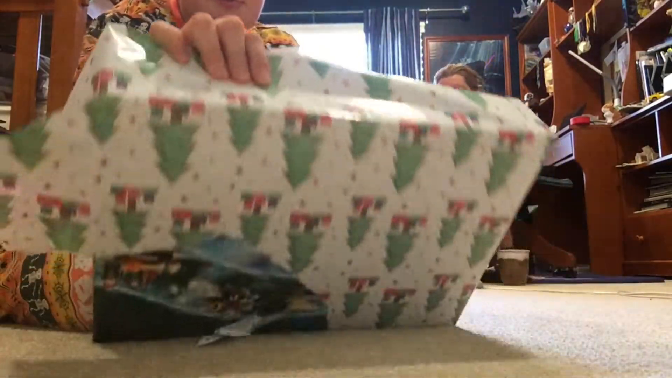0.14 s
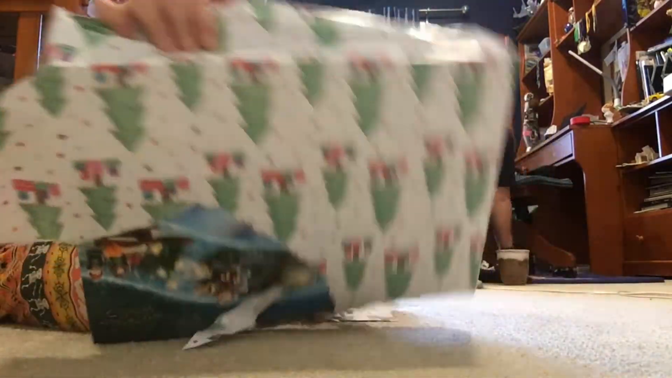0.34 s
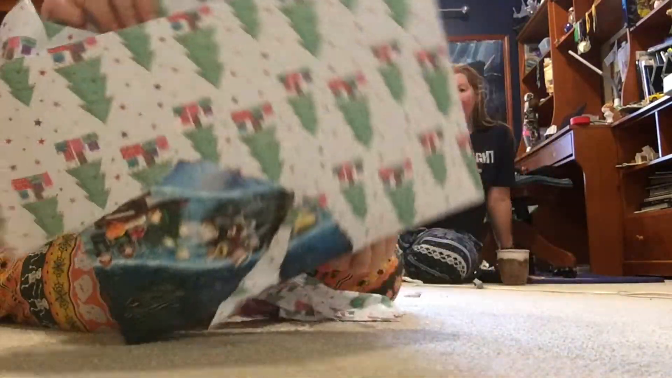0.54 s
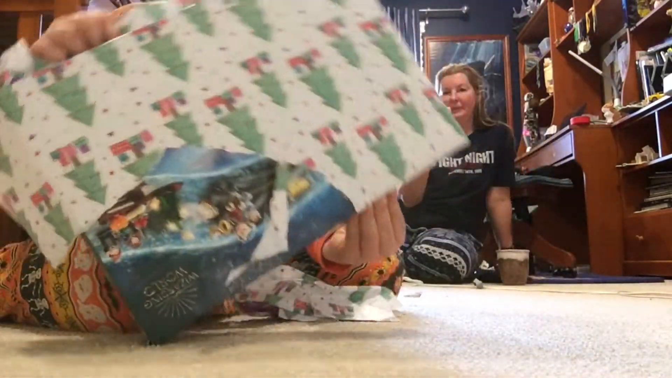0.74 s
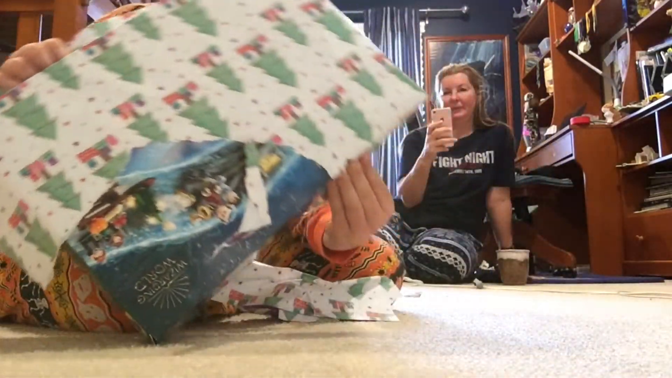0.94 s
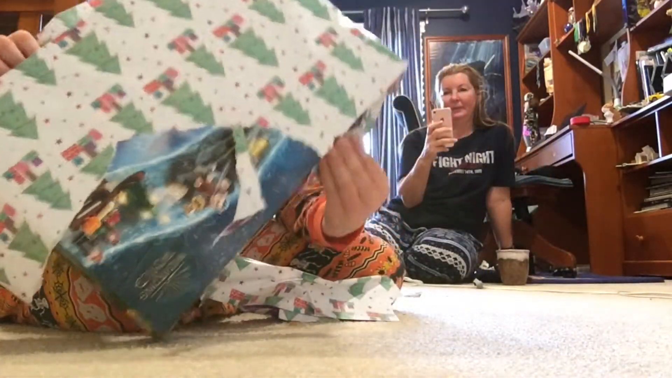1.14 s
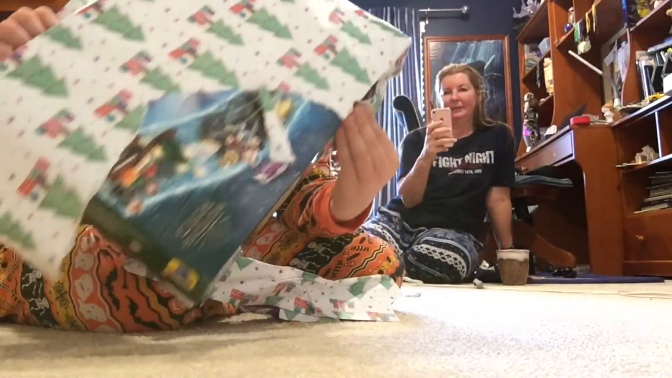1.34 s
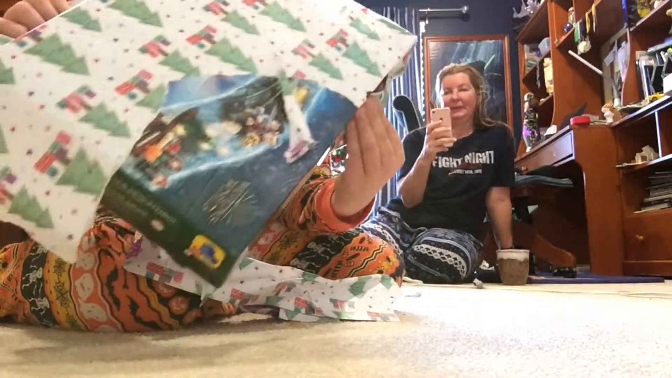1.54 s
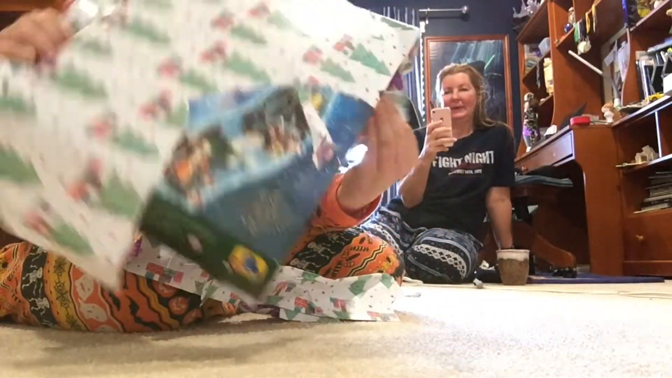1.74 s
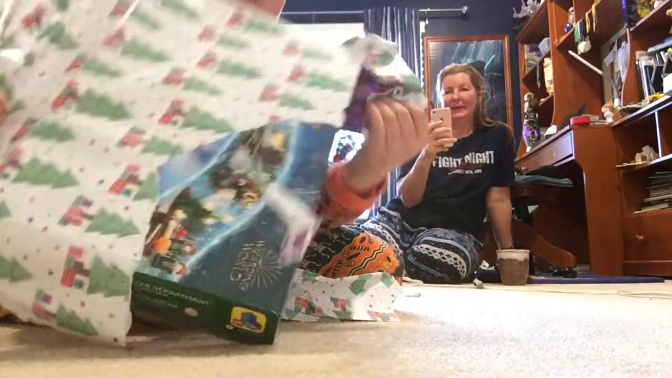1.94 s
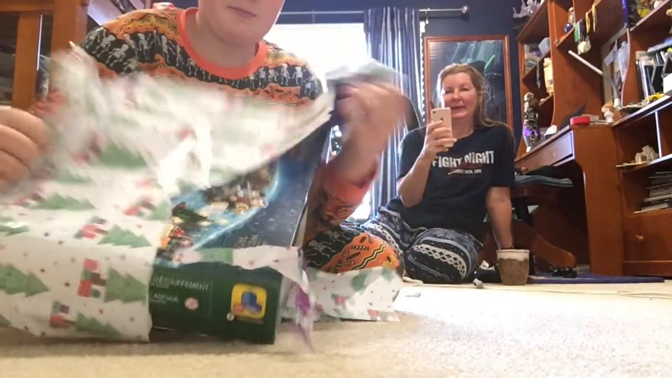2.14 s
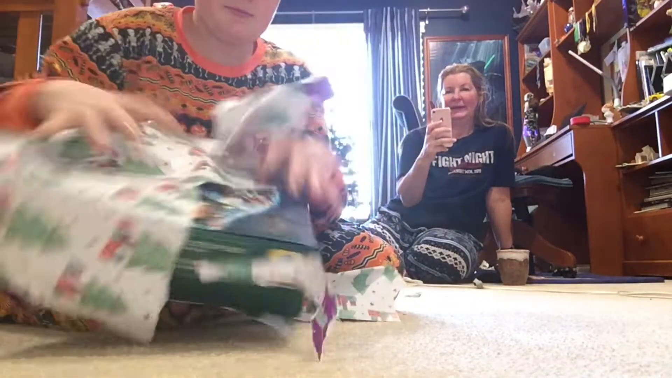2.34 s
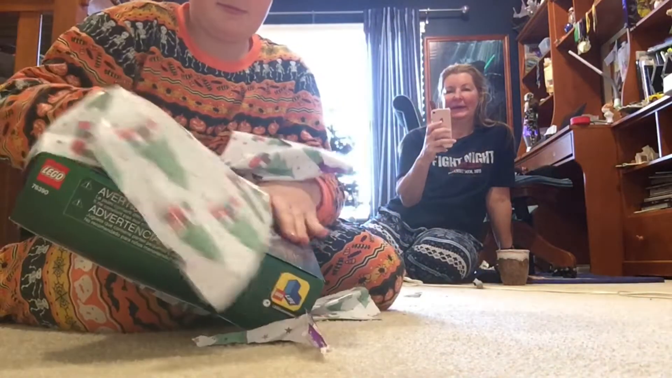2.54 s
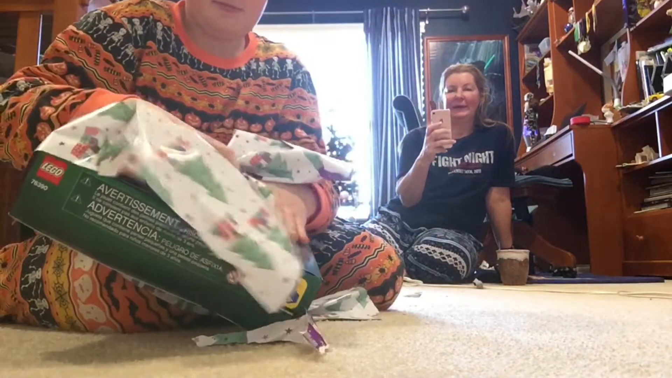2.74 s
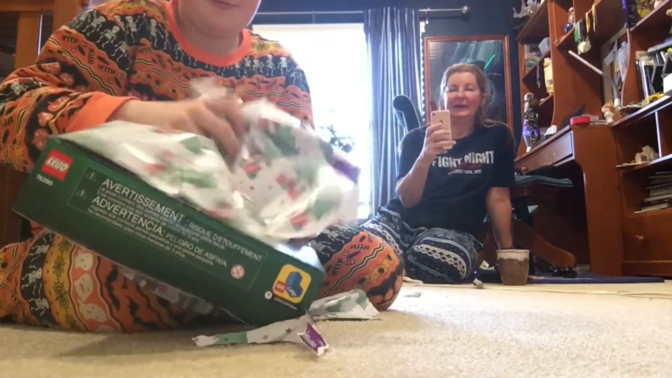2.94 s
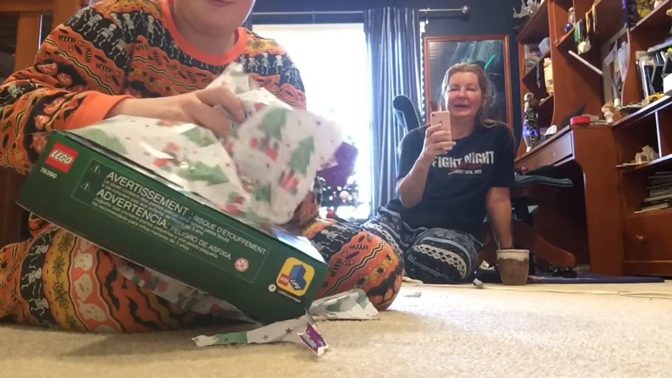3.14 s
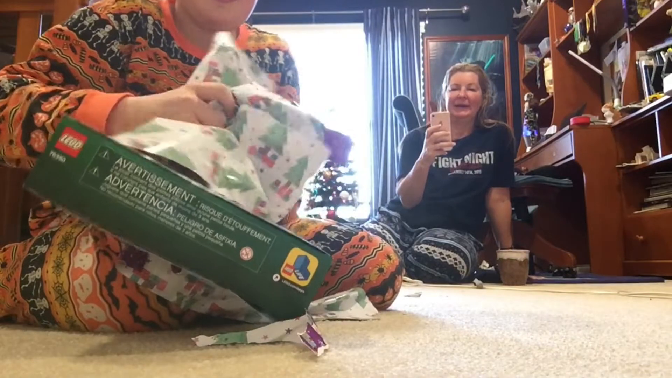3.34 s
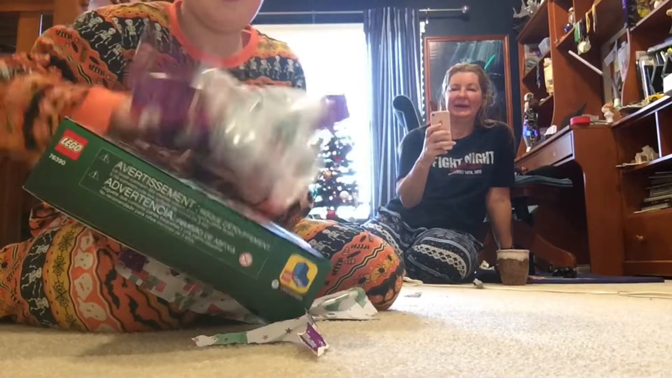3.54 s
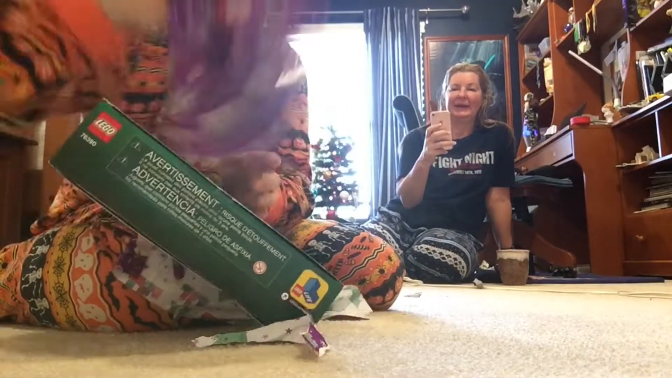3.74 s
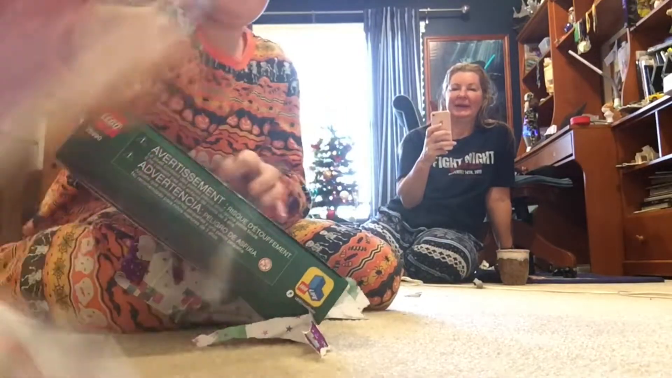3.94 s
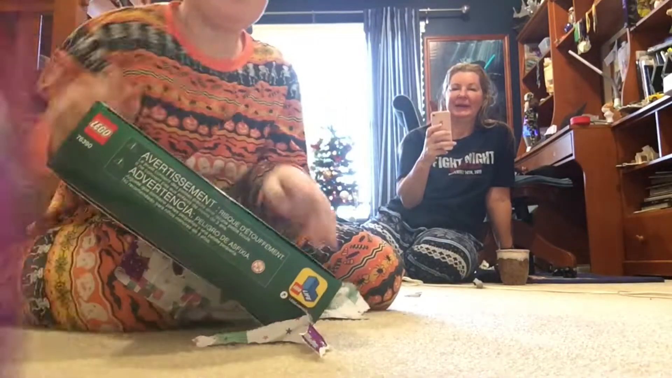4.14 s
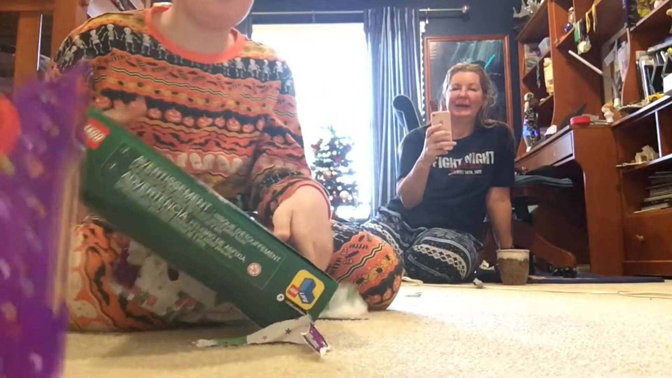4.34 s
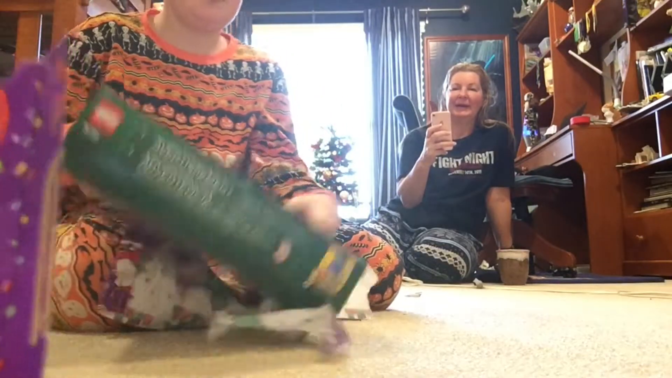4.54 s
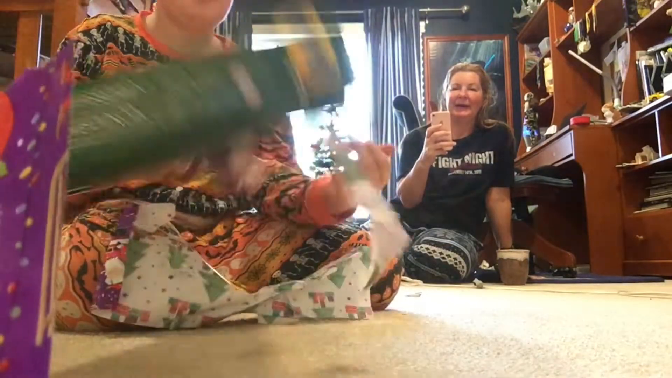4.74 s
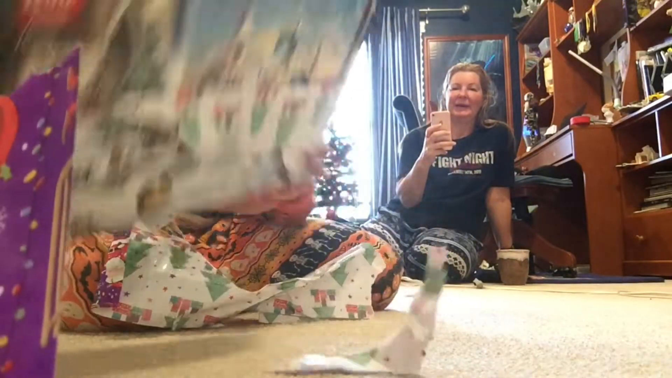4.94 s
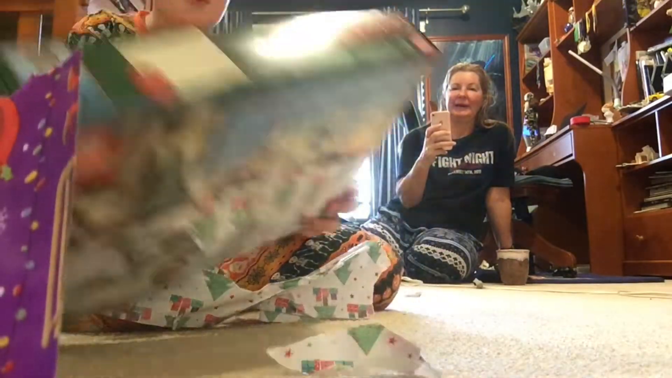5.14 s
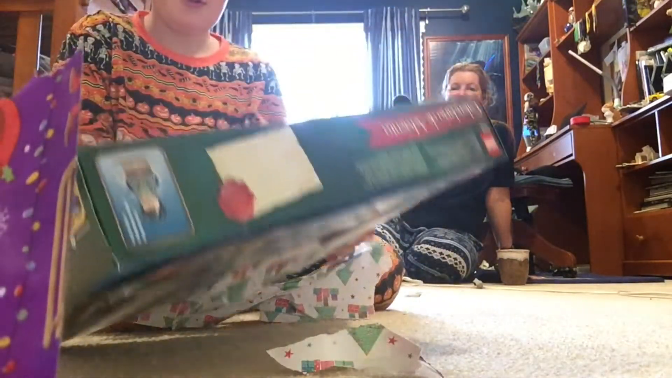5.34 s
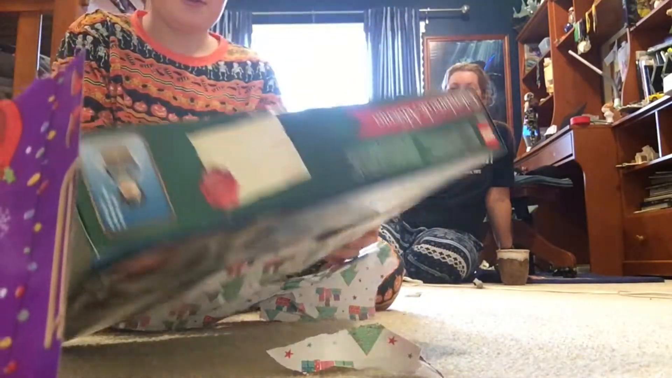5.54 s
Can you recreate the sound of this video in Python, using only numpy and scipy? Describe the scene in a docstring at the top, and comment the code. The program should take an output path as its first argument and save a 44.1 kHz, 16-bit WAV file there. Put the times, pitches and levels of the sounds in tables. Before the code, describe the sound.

A close, dry phone recording of gift wrap being pulled off a cardboard box in a carpeted, furnished room, with a faint steady low hum beneath. From 0 to 1.2 s, short irregular grips make bright crackles and crisp creasing snaps, one especially sharp near 0.27 s, with light hollow box rumble. A lull follows until about 1.6 s. A strong rip and box knock burst out near 1.8 s, then dense, louder tearing and crumpling runs in uneven pulls to 3.8 s, peaking around 2.3 s, with many ringing snaps and soft carton bumps. At about 3.85 to 4.1 s the sheet is tossed aside: a loud snap, deep flapping puffs, several dull thuds and a thin airy hiss that fades. Afterwards it is mostly quiet, with faint rustles, then abrupt snaps and hollow knocks at 4.9 and 5.03 s, and one last softer bump near 5.65 s.

```python
"""Gift paper is torn and crumpled off a cardboard box in a furnished room with a low hum, for under 6 s.
From the start, each grip of the hands swells a crackle of tiny noise bursts; creases snap as sharper, ringing bursts.
The sheet flaps and the box rumbles (filtered noise), air puffs and box knocks are short swings, and the room rings.
After a lull from about 1.2 s the pulls grow louder; near 3.84 s the sheet is tossed aside with an airy, fading hiss.
Sparser, mostly quieter grips follow, with a few strong snaps and knocks near 5 s."""
import sys
import numpy as np
from scipy import signal
from scipy.fft import rfft, irfft, next_fast_len
from scipy.io import wavfile
from scipy.ndimage import uniform_filter1d

SR = 44100
rng = np.random.default_rng(int(sys.argv[2]) if len(sys.argv) > 2 else 0)


def generate_wav(sig):
    """Save sig (samples, or channels by samples) to the path in sys.argv[1] as 16-bit PCM at SR."""
    pcm = np.round(np.clip(np.atleast_2d(sig).T, -1, 1) * 32767).astype(np.int16)
    wavfile.write(sys.argv[1], SR, pcm)


N = 250047  # length in samples

# Pulls and grips of the hands: full effort at t/s, build-up/s, hold/s,
# crackle level/dB, brightness/dB, sheet flap level/dB, hollow box level/dB
GRIPS = [(0.0, .01, 0.036, -41.5, 0.5, -52.5, -50.5), (0.124, 0.0076, .03, -54, 2, -51.5, -52.5),
         (0.197, 0.027, .14, -44.5, 1.5, -56, -48), (0.454, 0.095, .08, -51.5, -1, -52, -46),
         (0.583, 0.017, 0.048, -48.5, 0.5, -58, -55.5), (0.689, 0.052, 0.095, -52.5, -2, -55, -52.5),
         (0.864, 0.091, 0.087, -51, -1, -56, -45.5), (0.995, 0.011, 0.11, -41, 0.5, -50, -45.5),
         (1.163, 0.022, 0.029, -66.5, -9.5, -64, -57.5), (1.55, 0.036, 0.034, -67, -3.5, -61, -59),
         (1.649, 0.018, 0.21, -44.5, 0.5, -61, -49), (1.792, 0.057, 0.032, -30, 0.5, -42.5, -36.5),
         (1.871, .03, 0.14, -40, 0.5, -55.5, -44), (2.041, .03, 0.1, -39, 1, -50, -44),
         (2.154, 0.024, 0.026, -36, 1, -49, -43), (2.239, .02, 0.043, -41.5, -0.5, -50, -47.5),
         (2.338, 0.035, 0.047, -33.5, -0.5, -43.5, -41), (2.467, 0.036, 0.024, -39.5, 0, -47, -45.5),
         (2.579, 0.033, 0.19, -45.5, -1, -55, -50.5), (2.783, 0.01, 0.049, -39, -0.5, -58, -48.5),
         (2.851, .03, 0.074, -37.5, -0.5, -49, -45), (2.98, .02, 0.098, -41.5, -0.5, -61, -49),
         (3.094, .03, 0.046, -40, 0, -63, -47.5), (3.173, 0.022, 0.084, -42, -2.5, -53, -47),
         (3.292, .03, 0.062, -40.5, -0.5, -60, -47.5), (3.442, 0.077, 0.12, -47.5, -1.5, -59, -55),
         (3.539, 0.064, 0.037, -38, -1.5, -63, -47), (3.63, .03, 0.0075, -37, -1, -43.5, -45.5),
         (3.699, 0.016, 0.13, -42.5, -1, -58, -49.5), (3.832, 0.033, 0.021, -40, -2, -43, -43),
         (3.896, 0.016, 0.052, -36.5, -3, -31, -33), (4.005, 0.017, 0.11, -58, -2.5, -38.5, -49),
         (4.194, 0.044, 0.14, -63, -0.5, -59, -56), (4.358, 0.035, .06, -71.5, 2, -66, -62.5),
         (4.464, 0.049, 0.026, -59.5, -1, -53, -53.5), (4.513, .05, 0.035, -55, -0.5, -49.5, -48.5),
         (4.627, .02, 0.015, -66, -2, -59, -62.5), (4.793, 0.054, 0.085, -62.5, -6, -58, -53.5),
         (4.895, 0.0083, 0.0069, -36.5, -1.5, -39.5, -32), (5.019, .02, 0.02, -42.5, -8, -38.5, -39),
         (5.13, .03, 0.052, -57.5, -3, -52, -51), (5.359, 0.095, 0.0078, -68.5, 3, -75.5, -72.5),
         (5.634, 0.067, .05, -55, 1, -69, -67), (5.66, 0.01, .02, -50.5, -6, -39.5, -37.5)]
# Levels while the hands rest: crackle, flap, box level/dB
REST_LEVELS = (-79.5, -67.5, -74.5)
# Colour of the low hum: f/Hz, level per Hz/dB
HUM_COLOUR = [(20, -44.5), (40, -26), (95, -26), (135, 6.5), (190, -12), (245, -6), (450, -37), (1200, -49),
              (4300, -50), (9000, -47), (16000, -52)]
# Colour of folding paper: f/Hz, level per Hz/dB
PAPER_COLOUR = [(290, -51.5), (500, -2.5), (893, -15.5), (1160, -0.5), (1510, -7.5), (1670, -2), (2100, -3),
                (3110, -2.5), (3440, -4.5), (4730, -1), (5630, -7.5), (6800, -7), (10700, -12.5),
                (12100, -10), (16000, -28)]
# Colour of the flapping sheet: f/Hz, level per Hz/dB
FLAP_COLOUR = [(20, -32.5), (45, -6), (80, 8), (110, 8.5), (140, 11.5), (180, -1.5), (300, -35.5)]
# Colour of the hollow box: f/Hz, level per Hz/dB
BOX_COLOUR = [(120, -23), (190, 2.5), (280, 0), (400, 0), (520, -9), (800, -12), (1200, -35)]
# Creases whose snaps stand out from the rustle around them, plus loose pieces rattling in the box just after
# the knock near 4.87 s: t/s, peak level/dB, ring f/Hz, ring boost/dB, treble edge/dB (before the shared lift in
# snaps), decay/ms
SNAPS = [(.0193,-28,3780,24,-23,2.5),(.0444,-23.5,3750,24,3,0.49),(.145,-32,1750,8.5,-27,0.96),(.1897,-33.5,5930,7,0,6.8),
         (.205,-34.5,8300,22.5,-4,4),(.2191,-24,8400,12,6,1.8),(.225,-26,4230,17,8,2.7),(.235,-31,2350,12.5,-6,3.4),
         (.258,-33.5,3250,5,-5,1.7),(.271,-8,2735,20.5,-17,0.71),(.2834,-30,2300,26.5,-11.5,4),(.3194,-30,1670,15,-15,2.1),
         (.338,-30,1290,18,-8,3.1),(.4529,-35,3270,9,-15,6.1),(.4667,-29,5200,9,-3,.7),(.483,-30,1090,12,-22,1.7),
         (.503,-33.5,2480,20,-30,1.6),(.5226,-29.5,2640,4,-44,3.1),(.5837,-35.5,1530,22,-16,3.4),(.6045,-37,4400,3,-10,2.6),
         (.6182,-26,1800,9,-14,1.34),(.6943,-22,3360,6,1,1.5),(.8533,-30.5,3580,16,11,1.5),(.9115,-29.5,1780,19,10,3.2),
         (.9896,-31,4130,13,-1,1.2),(1.0034,-21.5,4300,11,-2,2.6),(1.0116,-30.5,4700,9,-3,5),(1.026,-25.5,8420,19,-10,1.9),
         (1.0452,-20,4100,11,-12,0.81),(1.0956,-23,6370,24,-8,0.95),(1.11,-24,6300,22,-22,1.2),(1.1881,-33,2310,18,-24.5,1.6),
         (1.5419,-48.5,2110,3,-20.5,2),(1.6512,-29.5,4260,12,25,2.5),(1.718,-33,2390,24,-8,4.2),(1.7455,-27,3045,9,-8,4.2),
         (1.7681,-12.5,5300,16,1,1.5),(1.7855,-30,3660,14,-14,3.8),(1.813,-13.5,6950,15.5,-20,3),(1.8227,-16,4570,10,1,5.7),
         (1.8355,-19.5,6570,9,2,4.6),(1.8605,-32,4440,11,-12,4.8),(1.8885,-23,5100,14,-7,8.2),(1.9485,-24,3730,3,0,21),
         (1.9723,-26.5,3040,7,0,9.2),(2.0107,-25,2000,2,-19,2.1),(2.0519,-32,2470,15,-7,3.1),(2.075,-23.5,5300,8,-2,2.3),
         (2.0898,-22,3070,18,-1,3.3),(2.1188,-15,4330,17,-19,0.42),(2.1613,-16,1760,17,-11,1.4),(2.1667,-15.5,4500,8.5,2,2.1),
         (2.1744,-24,1715,11,-2,2.5),(2.2574,-21.5,4250,18.5,5,2.8),(2.2666,-23.5,4230,2.5,-2,2.4),(2.3301,-16,4060,12,5,1.5),
         (2.339,-11.5,4130,8,2,2.7),(2.3598,-12.5,4760,11,15,2.9),(2.3731,-21,4390,8,12.5,4.6),(2.3873,-13,4700,13,12,2.2),
         (2.408,-27,2540,8,-2,4.2),(2.441,-22,4630,4,-2,1.6),(2.4759,-28,2390,15,-21,1.9),(2.489,-32,5120,7,-14,2.4),
         (2.5219,-19.5,4700,15,0,.6),(2.5881,-14,8800,1,37,0.77),(2.626,-25.5,1330,18,-20,2.6),(2.649,-17,4500,7,-8,0.91),
         (2.7107,-27.5,1430,13,-17,5),(2.7232,-24.5,1430,15,-3,2.5),(2.785,-16.5,4260,11,-11,1),(2.7941,-19.5,4660,15,-2,3.4),
         (2.8258,-23,3880,15,-3,2.7),(2.8532,-12.5,1290,9,1,1),(2.8649,-27,1280,14,-18,4.7),(2.8908,-15.5,4600,4,-11,1.2),
         (2.915,-28,4730,6,-14,4.7),(2.9312,-35,4080,8,-17,4.2),(2.971,-34,4740,5,-8,3.6),(2.9868,-20,4630,8,14,0.83),(2.9962,-19,4400,17.5,-9,.7),
         (3.0183,-17,4870,3,1,0.66),(3.0254,-23,4030,6,0,2.4),(3.0507,-16.5,1440,11,-5,1.4),(3.0638,-33,4690,10,-2,3.5),
         (3.1056,-24.5,3100,14,-9,2.1),(3.1115,-16.5,2430,14,0,1.4),(3.1318,-19.5,2330,19,-3,1.8),(3.178,-24,6800,14,-29,1.6),
         (3.1933,-32,3900,14,-30,3),(3.2369,-25,1790,7.5,-15,2),(3.2458,-23.5,2880,13.5,-15,2.5),(3.2814,-28,4200,24,-11,1.5),(3.3016,-23,2360,30,-22,1.1),
         (3.3115,-13,4100,18,1,0.75),(3.3537,-19.5,4570,6,5,1.7),(3.3663,-25,3920,8,-2,2.1),(3.4548,-25.5,2240,16,-21,0.9),
         (3.5326,-21,1700,20,-34,0.85),(3.5559,-26,2460,14,-16,3),(3.5644,-27,2320,16,-18,3.4),(3.5854,-30,2780,17,-24,3.1),
         (3.6327,-20.5,4620,10,-2,3.1),(3.7064,-28,1775,4,-5,4),(3.7348,-40,1686,10.5,-19,.9),(3.7645,-28,4720,3,11,1.7),
         (3.8402,-27,1890,9,-29,2.5),(3.8642,-15,6500,17,-26,1.3),(3.8756,-17,3500,3.5,-12,4.4),(3.9039,-7,5710,14,1,.9),
         (3.91,-14.5,1497,18.5,-3,5.5),(3.9284,-16,4400,4,-6,2.8),(3.9505,-18,1280,17.5,5,2.5),(3.9745,-17.5,8600,11,10,3),
         (3.9855,-29.5,8700,24,7,1.1),(4.0055,-34,2370,15,-6,2.9),(4.0888,-39,4550,6,-13,2.1),(4.219,-38.5,2127,6,-34,5),
         (4.264,-41.5,1050,12,-56,4.9),(4.3072,-45,1180,14,-11,5),(4.3124,-47.5,5700,19,-13,2.4),(4.461,-48.5,1040,22,-43,8.1),(4.509,-38,1190,17,30,3.9),
         (4.632,-45.5,4750,7,-15,3.9),(4.867,-24.5,1782,23,-52,4.5),(4.869,-22.5,1135,37.5,-62,2),(4.8975,-26,4220,9,8,5.5),
         (4.9048,-32,2270,8,-24,4.1),(4.981,-44,4500,8.5,-19.5,2.5),(5.013,-49,1230,12,-28.5,2.9),(5.0311,-16,2016,18,-32,2.4),
         (5.0345,-22,1880,21,-37,2.6),(5.046,-30,1092,17,-33,5.3),(5.058,-32.5,1820,14.5,-28,4.4),(5.149,-51,1300,11,-14,3),
         (5.168,-41.5,1216,11,-19,3.8),(5.5132,-57.5,4220,18.5,-13,0.93),(5.6228,-42.5,2650,11,-16,4.8),(5.6305,-36.5,4770,29,-27,1.6),
         (5.6627,-38,1580,27,-36,3.4)]
# A small patch of paper moves little low air: f/Hz, level/dB
SNAP_BODY = [(400, -12.5), (1100, -3.5)]
# Puffs of air as the sheet jerks: t/s, peak level/dB, swing f/Hz
PUFFS = [(0.095, -39, 116), (0.308, -44, 135), (0.503, -43, 144), (0.674, -57, 136), (0.923, -41, 157),
         (1.311, -50, 147), (1.459, -50, 124), (1.753, -45, 169), (1.797, -43.5, 75), (1.961, -37, 112),
         (2.13, -36.5, 134), (2.345, -41, 134), (2.612, -52, 132), (2.889, -50, 117), (3.216, -41, 170),
         (3.626, -52, 143), (3.858, -47, 40), (3.858, -31, 110), (3.94, -28, 55), (4.128, -36, 60),
         (4.218, -44, 112), (4.479, -55, 73), (4.52, -47, 153), (4.888, -48, 127), (4.999, -42, 113),
         (5.127, -47, 151), (5.265, -50, 143), (5.493, -53.5, 148), (5.645, -44, 70)]
# Knocks on the box: t/s, peak level/dB, panel f/Hz
KNOCKS = [(0.192, -47.5, 210), (0.448, -32.5, 374), (0.692, -38.5, 396), (0.843, -42, 370),
          (0.912, -33.5, 257), (0.954, -38, 396), (1.094, -38.5, 222), (1.651, -37, 211),
          (1.717, -35.5, 318), (1.758, -34, 264), (1.81, -21.5, 255), (2.149, -32.5, 397),
          (2.257, -35, 215), (2.335, -32, 372), (2.36, -31.5, 266), (2.387, -33, 180), (2.468, -36.5, 226),
          (2.623, -39, 312), (2.679, -34.5, 323), (2.724, -32, 237), (2.839, -34.5, 256),
          (2.916, -33.5, 385), (3.049, -35, 263), (3.177, -36, 360), (3.452, -40, 214), (3.64, -33, 226),
          (3.797, -33, 207), (3.869, -21.5, 169), (3.925, -21, 261), (3.971, -24, 181), (4.048, -26.5, 178),
          (4.088, -24.5, 176), (4.305, -40.5, 327), (4.462, -38, 215), (4.544, -32.5, 234),
          (4.866, -34.5, 420), (4.898, -22.5, 360), (4.98, -33, 170), (5.01, -23, 419), (5.14, -38.5, 374),
          (5.655, -31.5, 266)]
# Colour of the sheet thrown aside: f/Hz, level per Hz/dB
TOSSED_COLOUR = [(4000, -30), (9000, -2), (13000, -0.5), (16000, -13)]
# Colour of the microphone port: f/Hz, level/dB
PORT_COLOUR = [(6500, -1.5), (8600, 0), (10500, -5.5)]

BUILD_UP_DB, LET_GO_DB_PER_S = 18, 230  # rise over the build-up; fall after the hold
SAG_DB_PER_S, DULLING_DB_PER_S = 4.5, 6.5  # from full effort on, the pull slackens and the paper dulls
SETTLE_DB, SETTLE_DB_PER_S = -16.5, 72  # once let go, the paper goes on unfolding, fainter and slower
HUM_DB = -61
GRAINS = 9000  # number of tiny folds
ROOM_T60_S, ROOM_DB = 0.13, -13.5  # time to fade by 60 dB; level of the tail
SNAP_RISE_SHARE = 0.41  # build-up as a share of the decay
LESSER_SNAPS = 260  # number of further, random creases
LESSER_OVER_CRACKLE_DB, LESSER_SPREAD_DB = 7, 3
IDLE_BELOW_DB, IDLE_SLOPE = -62.5, .6  # idle hands snap softer: extra dB lost per dB below this crackle level
KNOCK_MS = 3.6  # time to full swing
TOSSED_S, TOSSED_DB, TOSSED_DB_PER_S = 3.84, -64, 13.5  # start of the airy hiss, level, fade
TOP_HZ = 15700  # highest pitch the phone keeps


def undb(db):
    """Turns decibels into a plain gain."""
    return 10 ** (np.asarray(db) / 20)


def unit(x):
    """Scales a sound to an average (RMS) strength of 1."""
    return x / np.sqrt(np.mean(x ** 2))


def colour_db(points, hz):
    """Reads a colour table (f/Hz, level/dB) on a log pitch axis."""
    f, db = np.transpose(points)
    return np.interp(np.log(np.maximum(hz, 1)), np.log(f), db)


def shaped(x, points):
    """Filters a sound by a colour table."""
    size = next_fast_len(N)
    hz = np.arange(size // 2 + 1) * SR / size
    return irfft(rfft(x, size) * undb(colour_db(points, hz)), size)[:N]


def coloured_noise(points):
    """Steady noise with the colour of a table and strength 1."""
    return unit(shaped(rng.standard_normal(N), points))


def walk(rate):
    """A slow wobble that glides to a new random level `rate` times a second, with RMS 1."""
    k = int(SR / rate)
    steps = np.repeat(rng.standard_normal(N // k + 1), k)
    return unit(uniform_filter1d(steps, k)[:N])


def bursts(s, gain, ms, tone_db, size, rise_ms):
    """Short noise bursts, each with its own colour (a row of tone_db), build-up, decay and peak."""
    puff = irfft(rfft(rng.standard_normal((len(s), size))) * undb(tone_db), size)
    lead = size // 4  # samples kept for the build-up
    t_ms = (np.arange(size) - lead) * 1000 / SR
    rise = np.reshape(np.maximum(rise_ms, .05), (-1, 1))
    fall = np.reshape(np.maximum(ms, .05), (-1, 1))
    puff = puff * np.exp(np.minimum(t_ms / rise, -t_ms / fall))
    puff = puff * (gain / np.abs(puff).max(axis=1))[:, None]
    at = (np.asarray(s) * SR).astype(int)[:, None] + np.arange(size)
    return np.bincount(at.ravel(), puff.ravel(), N + size)[lead:N + lead]


def facet_db(hz, ring_hz, lift_db, octaves):
    """The flat patch beside a crease favours one band of pitches."""
    distance = np.log2(np.maximum(hz, 1) / ring_hz[:, None]) / octaves
    return lift_db * np.exp(-.5 * distance ** 2)


def swings(s, peak_db, hz, ms):
    """Short swings that build up for ms, then die away while their pitch sinks a little."""
    t = np.arange(4096) / SR
    shape = (t * 1000 / ms * np.exp(1 - t * 1000 / ms)) ** 1.33
    turn = hz * t * (1 - 1.5 * t) + rng.random((len(s), 1))
    swing = undb(peak_db) * shape * np.sin(2 * np.pi * turn)
    at = (s * SR).astype(int) + np.arange(len(t))
    return np.bincount(at.ravel(), swing.ravel(), N + len(t))[:N]


def effort():
    """Each grip builds up, holds and lets go, setting crackle, flap and box levels and brightness, in dB."""
    s, build_s, hold_s, crackle_db, bright_db, flap_db, box_db = np.transpose(GRIPS)[:, :, None]
    t = np.arange(0, N / SR, 1 / 1000)
    build_db = BUILD_UP_DB * (t - s) / np.maximum(build_s, .002)
    after_hold = s + hold_s - t  # negative once let go
    shape_db = np.minimum(0, np.minimum(build_db, LET_GO_DB_PER_S * after_hold))
    since = np.maximum(t - s, 0)
    settle_db = np.where(t > s + hold_s, SETTLE_DB + SETTLE_DB_PER_S * after_hold, -np.inf)
    shape_db = np.maximum(shape_db, settle_db) - SAG_DB_PER_S * since
    power = [undb(2 * (db + shape_db)) for db in (crackle_db, flap_db, box_db)]
    total = [p.sum(axis=0) + undb(2 * rest_db) for p, rest_db in zip(power, REST_LEVELS)]
    # the stronger grip decides the brightness
    tilt_db = (power[0] * (bright_db - DULLING_DB_PER_S * since)).sum(axis=0) / total[0]
    curves = [10 * np.log10(p) for p in total] + [tilt_db]
    return [np.interp(np.arange(N) / SR, t, c) for c in curves]


def low_hum():
    """A low hum made of coloured noise that wavers slightly."""
    return coloured_noise(HUM_COLOUR) * undb(HUM_DB + 0.67 * walk(11))


def crackle(level_db, tilt_db):
    """Countless small folds, a few much louder than the rest, over the hiss of paper sliding on paper."""
    when, pitch, long, loud = rng.random((GRAINS, 4)).T
    hz = np.arange(129) * SR / 256
    tone_db = colour_db(PAPER_COLOUR, hz) + facet_db(hz, 900 * 12 ** pitch, lift_db=19, octaves=0.33)
    gain = undb(np.minimum(-3.5 * np.log(1 - loud), 15))
    folds = bursts(when * N / SR, gain, 0.73 + 2.3 * long, tone_db, size=256, rise_ms=0.43)
    # folds come in flurries
    flurries = unit(folds) * undb(2.5 * walk(60))
    paper = flurries + undb(-1.5) * coloured_noise(PAPER_COLOUR)
    dull = shaped(paper, [(2000, 9.0), (4000, -38.5)])
    bright = shaped(paper, [(4500, -53.0), (9000, -6.0)])
    # crisp tearing favours the top, soft rubbing the bottom
    paper = paper + (undb(-tilt_db) - 1) * dull + (undb(tilt_db) - 1) * bright
    # the very top follows level and brightness: faint, dull rustling has less of it
    top = shaped(paper, [(7000, -44), (12000, 2.5)])
    top_db = np.minimum(.3 * (level_db + 55.5) + .6 * tilt_db, 3)
    paper = paper + (undb(top_db) - 1) * top
    return unit(paper / undb(np.abs(tilt_db) / 2)) * undb(level_db)


def sheet_flap(level_db):
    """The loose sheet flaps: deep noise with a wavering level."""
    return coloured_noise(FLAP_COLOUR) * undb(level_db + 1.2 * walk(30))


def box_rumble(level_db):
    """The hollow box rumbles in the hands: low noise with a wavering level."""
    return coloured_noise(BOX_COLOUR) * undb(level_db + 1.77 * walk(30))


def room(x):
    """Carpet and shelves leave only a short, diffuse tail: noise that fades evenly at all pitches."""
    t = np.arange(SR // 2) / SR
    tail = rng.standard_normal(len(t)) * undb(-60 * t / ROOM_T60_S)
    tail = tail * np.clip(t / 0.011, 0, 1)  # the tail fades in over 11 ms
    return signal.fftconvolve(x, tail / np.sqrt(np.sum(tail ** 2)))[:N] * undb(ROOM_DB)


def snaps(rows):
    """A crease gives way: a sharp burst that rings its patch of paper for a few cycles."""
    s, peak_db, ring_hz, lift_db, edge_db, ms = np.transpose(rows)
    hz = np.arange(1025) * SR / 2048
    # the treble edge grows steadily with pitch from 2200 Hz up
    edge = np.clip(np.log2(np.maximum(hz, 1) / 2200) / 3.7, 0, 1)
    tone_db = colour_db(PAPER_COLOUR, hz) + facet_db(hz, ring_hz, lift_db[:, None], octaves=0.11)
    tone_db = tone_db + colour_db(SNAP_BODY, hz) + (edge_db[:, None] + 12) * edge
    return bursts(s, undb(peak_db), ms, tone_db, size=2048, rise_ms=SNAP_RISE_SHARE * ms)


def lesser_snaps(level_db):
    """Further creases snap at random times, louder when the hands are busy."""
    when, loud, pitch, ring, edge, long = rng.random((LESSER_SNAPS, 6)).T
    busy_db = level_db[(when * N).astype(int)]
    idle_db = IDLE_SLOPE * np.minimum(busy_db - IDLE_BELOW_DB, 0)
    peak_db = busy_db + idle_db + LESSER_OVER_CRACKLE_DB - LESSER_SPREAD_DB * np.log(1 - loud)
    # same columns as SNAPS
    rows = [when * N / SR, peak_db, 1100 * 6 ** pitch, 4 + 12 * ring, -22 + 22 * edge, .9 + 3 * long]
    return snaps(np.transpose(rows))


def puffs():
    """Each jerk of the sheet pushes about one cycle of air."""
    s, peak_db, swing_hz = np.transpose(PUFFS)[:, :, None]
    return swings(s, peak_db, swing_hz, 650 / swing_hz)


def knocks():
    """A hand or the floor meets the box: one panel swings for a few cycles."""
    s, peak_db, panel_hz = np.transpose(KNOCKS)[:, :, None]
    return swings(s, peak_db, panel_hz, KNOCK_MS)


def tossed():
    """The thrown sheet slides and unfolds on the carpet with a thin, airy hiss."""
    since = np.arange(N) / SR - TOSSED_S
    level_db = TOSSED_DB - TOSSED_DB_PER_S * since + 2.5 * walk(9)
    return coloured_noise(TOSSED_COLOUR) * np.clip(since / .03, 0, 1) * undb(level_db)


def scene():
    """Adds up all sounds; paper and knocks also ring the room."""
    level_db, flap_db, box_db, tilt_db = effort()
    near = crackle(level_db, tilt_db) + snaps(SNAPS) + lesser_snaps(level_db) + knocks() + tossed()
    moving = sheet_flap(flap_db) + box_rumble(box_db) + puffs()
    return (near + room(near) + moving + low_hum())[None]


def record(dry):
    """The microphone port favours a band near 8.6 kHz over the treble above it; the phone cuts the top."""
    through_port = shaped(dry[0], PORT_COLOUR)[None]
    top_cut = signal.ellip(10, .2, 60, TOP_HZ, fs=SR, output="sos")
    return signal.sosfilt(top_cut, through_port)


dry = scene()
out = record(dry)
generate_wav(out)
```